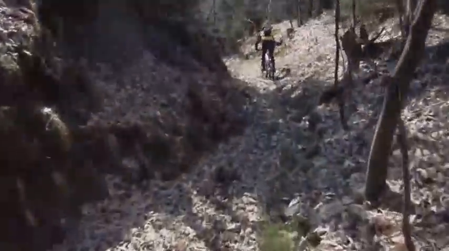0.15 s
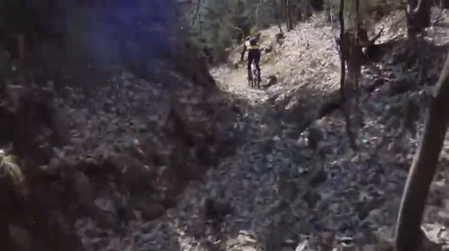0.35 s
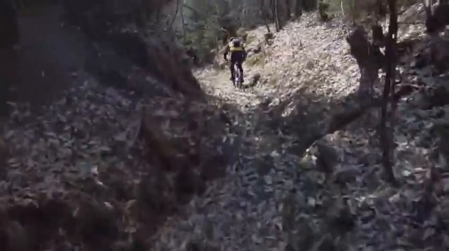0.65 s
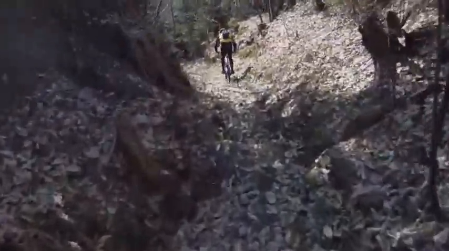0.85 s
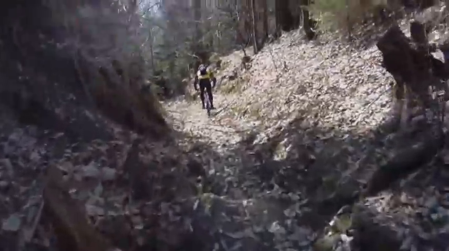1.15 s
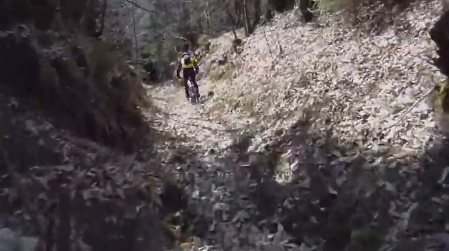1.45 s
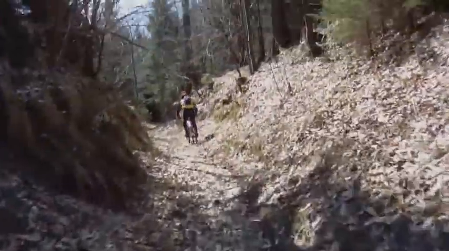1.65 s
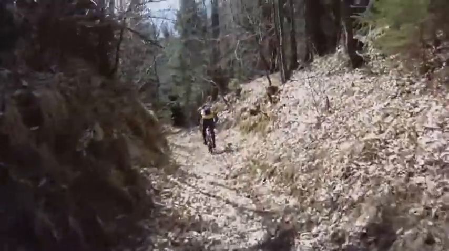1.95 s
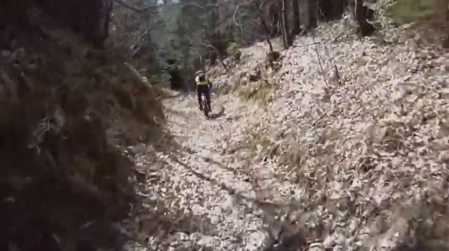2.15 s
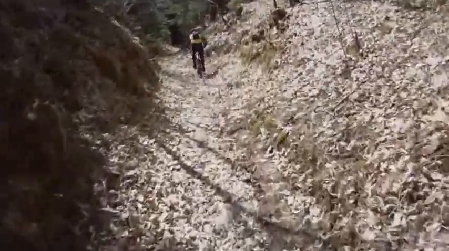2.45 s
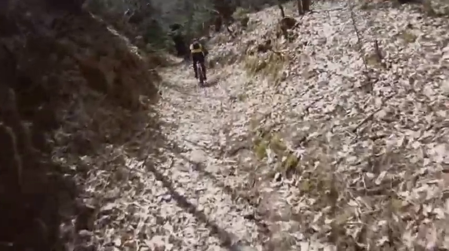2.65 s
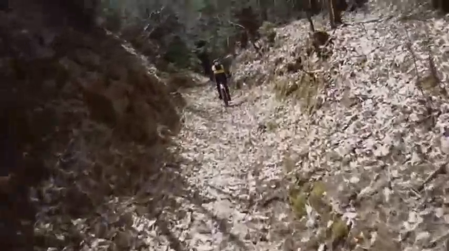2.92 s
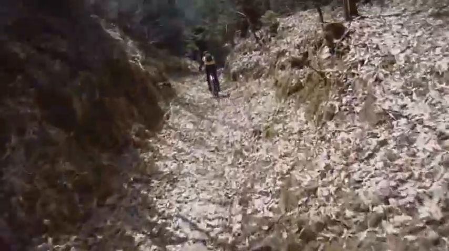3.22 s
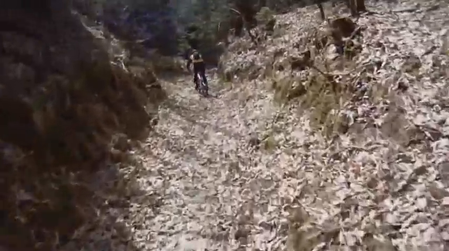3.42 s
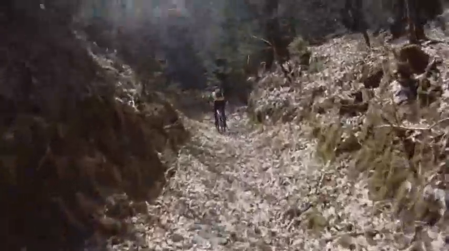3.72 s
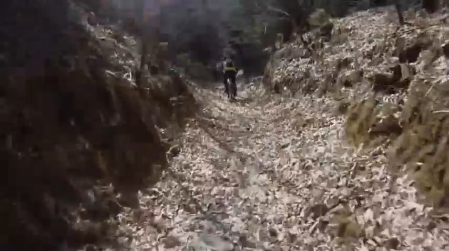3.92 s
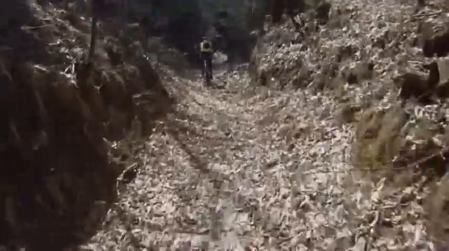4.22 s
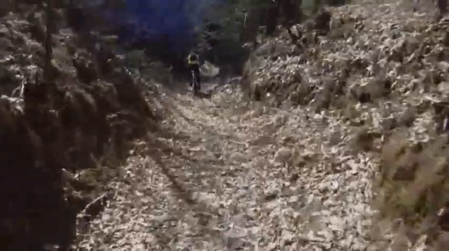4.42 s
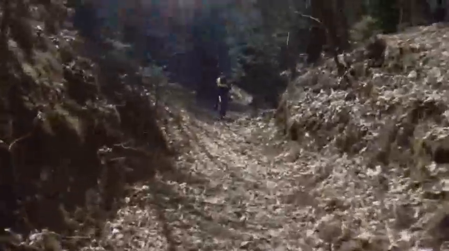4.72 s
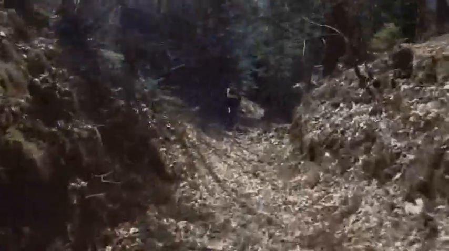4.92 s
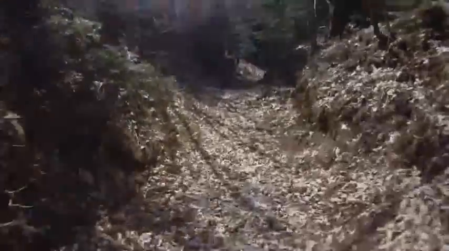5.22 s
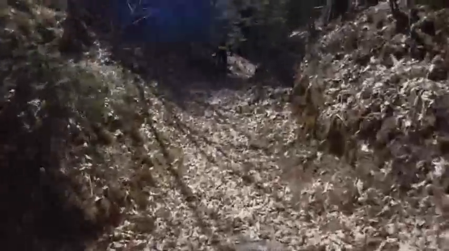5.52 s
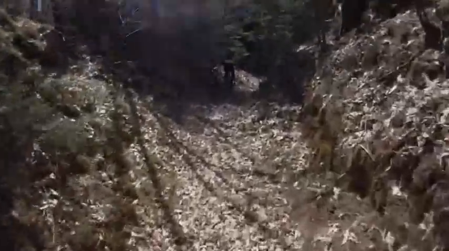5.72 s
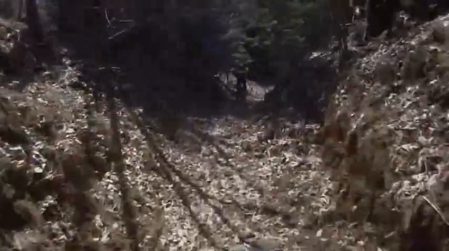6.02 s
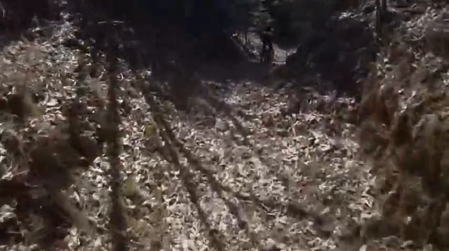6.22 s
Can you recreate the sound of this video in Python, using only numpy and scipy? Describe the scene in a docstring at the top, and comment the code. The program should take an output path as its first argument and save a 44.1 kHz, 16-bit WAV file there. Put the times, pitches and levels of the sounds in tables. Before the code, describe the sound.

Mountain bike tyres crackle through dry leaves and twigs, with frame knocks and a hollow wind rush that grows with speed.

```python
"""Dry leaves crackle and swish as a mountain bike coasts over them, down a forest trail.
The tyres burst heaps of leaves, snap twigs and flick stones. A faint hum comes and goes, the brake
pads make the discs squeak softly, and bumps knock through the frame. It is all heard from a camera
in a closed case on the rider: as the bike gathers speed, air and shaking from the trail beat on
the case and grow into a hollow rush."""
import sys
import numpy as np
from scipy import signal
from scipy.fft import rfft, irfft, next_fast_len
from scipy.io import wavfile

SR = 44100
rng = np.random.default_rng(int(sys.argv[2]) if len(sys.argv) > 2 else 0)


def wav_out(sig):
    """Save sig, one row per channel (or a flat mono array), as 16-bit PCM at SR to the path in sys.argv[1]."""
    wavfile.write(sys.argv[1], SR, np.round(np.clip(np.atleast_2d(sig).T, -1, 1) * 32767).astype(np.int16))


N = 280917

# Levels in the tables are relative: the functions may turn a whole layer up or down.
# how deep the leaves lie, given as how loudly they crackle: t/s, level/dB
LEAF_DEPTH = [(0.0, -60.5), (0.18, -68), (0.27, -58.5), (0.48, -66), (0.57, -59.5), (0.74, -60.5),
              (0.95, -57.5), (1.13, -56), (1.24, -62), (1.6, -62.5), (2.04, -64.5), (2.15, -60.5),
              (3.54, -62), (3.65, -63), (3.74, -57), (3.83, -55.5), (4.12, -58.5), (4.5, -57.5),
              (4.78, -53), (4.96, -59), (5.16, -59.5), (5.23, -57.5), (5.45, -53.5), (5.71, -60),
              (5.8, -58), (5.97, -59.5), (6.03, -62), (6.22, -60.5), (6.36, -56.5)]
# tone of leaf stems breaking: f/Hz, level/dB
STEM_TONE = [(200, -15), (650, 4.5), (1000, -5.5), (1400, -7), (2200, -0.5), (3500, 1.5), (4300, -3),
             (5500, -7.5), (9000, -15), (16000, -42.5)]
# tone of leaf blades crumbling: f/Hz, level/dB
BLADE_TONE = [(500, -7.5), (2500, 1), (5000, -3.5), (7500, 0), (9500, -2), (12000, -1.5), (15000, -8),
              (16000, -9)]
# pitches the camera case boosts or blocks: f/Hz, width/Hz, gain/dB
CASE_BANDS = [(2410, 650, 3.5), (2760, 182, -9), (3410, 3100, -3.5), (4125, 604, 10.5), (4475, 1070, -5),
              (6620, 1000, 4)]
# hollow rush on the case, growing with speed and rough ground: t/s, level/dB
RUSH_CURVE = [(0.0, -66.5), (0.52, -67.5), (0.58, -61.5), (0.66, -66), (0.86, -66), (0.92, -63.5),
              (1.35, -64.5), (1.785, -63), (1.81, -58.5), (1.96, -57.5), (2.0, -61), (2.075, -61),
              (2.095, -51.5), (2.17, -51.5), (2.28, -47), (2.43, -49.5), (2.53, -47.5), (2.57, -49.5),
              (2.7, -55.5), (2.8, -46), (3.03, -44), (3.29, -47.5), (3.41, -45.5), (3.56, -43.5),
              (3.66, -46.5), (3.84, -47.5), (3.99, -41.5), (4.11, -45.5), (4.19, -42.5), (4.38, -45),
              (4.415, -39.5), (4.63, -46), (4.93, -42), (5.0, -42.5), (5.12, -39), (5.17, -41.5),
              (5.26, -39.5), (5.37, -45.5), (5.48, -43.5), (5.61, -47.5), (5.78, -45.5), (6.36, -45)]
# tone of that rush: f/Hz, level/dB
RUSH_TONE = [(60, -19), (200, -3.5), (330, 0), (480, 1.36), (600, -0.5), (720, -6), (900, -13),
             (1200, -20.5), (1800, -29.5), (4000, -54), (16000, -58)]
# low wind beating on the case: t/s, level/dB
WIND_CURVE = [(0.0, -77), (0.78, -66), (1.09, -74), (1.35, -60), (1.785, -66), (1.81, -58), (2.07, -56.5),
              (2.1, -52), (2.35, -52), (2.59, -56), (3.02, -49.5), (5.31, -48.5), (5.5, -52), (6.36, -50)]
# tone of that wind: f/Hz, level/dB
WIND_TONE = [(15, -23.5), (35, -14.5), (80, -2.5), (150, -3), (240, -4), (400, -16), (900, -48.5),
             (16000, -79)]
# tone of the tread grinding soil: f/Hz, level/dB
GRIT_TONE = [(200, -27.5), (600, 4.5), (1200, -3.5), (1800, 5), (2400, 1), (3500, -16), (6000, -40),
             (16000, -43)]
# tone of the microphones' hiss: f/Hz, level/dB
HISS_TONE = [(100, -26), (600, -15), (2000, -28), (4000, -14), (6500, -4.5), (9000, 10), (14000, 5.5),
             (16000, -5.5)]
# big heaps of leaves bursting: t/s, level/dB, swish against that level/dB, length/s, stem f/Hz
BIG_HEAPS = [(0.09, -52.5, -18, 0.026, 3400), (0.178, -46.5, -18, 0.026, 2350),
             (0.312, -50, -26, 0.014, 2400), (0.375, -52.5, -26, 0.015, 3380),
             (0.559, -56, -26, 0.025, 3600), (0.89, -45, -19, 0.014, 3720), (0.996, -46, -16, 0.029, 2450),
             (1.13, -52, -21, 0.011, 2400), (1.169, -48.5, -19, 0.0089, 4000),
             (1.205, -47.5, -11, 0.013, 4200), (1.379, -50, -16, 0.0099, 3900),
             (2.089, -50.5, -15, 0.019, 3500), (2.176, -45.5, -13, 0.018, 3730),
             (2.262, -50, -13, 0.006, 3450), (2.291, -47, -22, 0.0064, 3640), (2.371, -61, -1, 0.009, 3500),
             (2.587, -52.5, -3.5, 0.036, 3460), (2.627, -52.5, -8, 0.04, 2400),
             (2.677, -63, -4, 0.023, 3500), (2.708, -59, 3, 0.024, 3900), (2.946, -52, -21, 0.029, 3300),
             (3.039, -50.5, -22, 0.034, 2450), (3.155, -43.5, -21, 0.0094, 3300),
             (3.243, -52, -24, 0.029, 4150), (3.306, -46, -17, 0.017, 3420),
             (3.374, -47.5, -27, 0.0095, 3400), (3.506, -54, -22, 0.016, 4000),
             (3.916, -45.5, -14, 0.029, 2280), (4.216, -42.5, -17, 0.0082, 4150),
             (4.279, -44, -15, 0.013, 4300), (4.406, -47.5, -14, 0.047, 1700),
             (4.567, -43, -16, 0.021, 2400), (4.642, -43.5, -15, 0.013, 3400),
             (4.839, -42, -26, 0.025, 2220), (4.873, -46, -10, 0.045, 3800), (4.998, -46, -17, 0.02, 3960),
             (5.198, -43.5, -16, 0.028, 3400), (5.256, -46, -31, 0.047, 2350),
             (5.556, -45, -8.5, 0.02, 3900), (5.63, -45, -11.5, 0.029, 2300),
             (5.672, -46, -19, 0.034, 4100), (5.708, -45, -14, 0.011, 3500),
             (5.878, -44.5, -21, 0.01, 3450), (5.965, -47.5, -23, 0.022, 3500),
             (6.054, -43.5, -15, 0.0088, 3980), (6.144, -44.5, -14.5, 0.014, 1700),
             (6.244, -41.5, -10.5, .016, 1900)]
# tone of a bursting heap: f/Hz, level/dB
HEAP_TONE = [(300, -15), (700, 0), (1300, -2), (2300, -1.5), (3000, 5.5), (3400, 4.5), (4200, 1),
             (5200, -4), (9000, -12), (16000, -72)]
# twigs snapping under the tyres: t/s, level/dB, f/Hz, width/Hz, tearing time/s
TWIG_SNAPS = [(0.1742, -52, 5500, 3300, .0022), (0.3825, -51, 4200, 2900, .0022),
              (0.9325, -49, 3300, 2200, .0022), (1.2035, -49, 5500, 3300, .0022),
              (1.433, -48, 3200, 1900, .0022), (2.2635, -47, 3450, 700, .003),
              (2.4225, -44.5, 3300, 1200, .0022), (2.489, -53, 6500, 4000, .0022),
              (3.417, -53, 6500, 4000, .0022), (3.867, -49, 8500, 5200, .0022),
              (3.917, -43, 8000, 4900, .0022), (4.349, -49, 5500, 3300, .0022),
              (4.356, -43, 3200, 1500, .0022), (4.6094, -46, 5000, 3000, .0022),
              (4.851, -42, 2200, 500, .006), (5.203, -43, 3500, 800, .006), (5.632, -44, 2300, 700, .004),
              (5.772, -48, 3800, 2300, .0022), (6.119, -50, 8500, 5200, .0016)]
# stones clacking under the tyres: t/s, level/dB, f/Hz
STONE_HITS = [(0.192, -52, 1610), (0.984, -46, 1080), (1.119, -53, 900), (2.4205, -48, 1550),
              (2.755, -48.5, 2140), (3.705, -45.5, 1620), (4.525, -42, 960), (4.586, -43.5, 1520),
              (5.3256, -43, 940), (5.3729, -40, 1190), (5.379, -44.5, 1550), (5.385, -43, 1220)]
# the ways a stone rings: multiple of its pitch, level/dB, time to fade by 60 dB/s
STONE_RINGS = [(.78, 9, 0.027), (1, 16, 0.017), (1.27, 10, 0.02), (1.7, 8, .01)]
# brake pads touching the discs: t/s, length/s, f/Hz, level/dB
PAD_TOUCHES = [(0.615, 0.016, 15130, -58), (0.729, 0.01, 15090, -62), (0.842, .008, 15050, -67),
               (0.954, .008, 15050, -67), (0.985, 0.016, 15200, -65), (1.213, 0.016, 15090, -67),
               (2.14, 0.035, 9990, -63.5), (2.192, 0.013, 9990, -59), (3.148, 0.028, 11880, -65),
               (3.287, 0.088, 11900, -61.5), (3.445, 0.078, 11890, -62), (3.844, 0.06, 11870, -66.5),
               (3.954, 0.04, 11840, -63), (4.17, 0.014, 15020, -64.5), (4.338, 0.026, 14900, -61.5),
               (4.568, 0.03, 11880, -58.5), (4.625, 0.025, 11880, -62.5), (4.774, 0.085, 11900, -56.5),
               (4.815, 0.012, 10100, -62), (4.922, 0.018, 14950, -59.5), (4.964, 0.03, 11820, -62),
               (5.025, 0.06, 11890, -62), (5.235, 0.055, 11780, -60.5), (5.342, 0.025, 11850, -65),
               (5.457, 0.03, 14930, -66), (5.938, 0.028, 11850, -57.5), (6.038, 0.016, 9990, -60)]
# bumps knocking through the frame: t/s, level/dB, metal clack against that level/dB
BUMPS = [(0.8195, -33, -3.5), (0.931, -42, -7), (1.602, -45, -16), (2.126, -40.5, -30), (2.281, -33, -30),
         (2.323, -33, -30), (2.478, -36, -30), (2.895, -28, -24), (2.979, -33, -30), (3.114, -32.5, -30),
         (3.341, -30.5, -30), (3.471, -32, -28), (3.882, -33, -30), (4.150, -29.5, -30),
         (4.243, -29.5, -30), (4.396, -30, -30), (4.421, -29.5, -30), (4.889, -34, -30), (4.976, -31, -30),
         (5.010, -30, -30), (5.094, -30, -30), (5.146, -30, -30), (5.227, -30.5, -30), (5.473, -30, -30),
         (5.526, -32.5, -20), (5.722, -32, -30), (5.758, -31.5, -30), (5.897, -31, -30)]
# the ways the frame rings: f/Hz, level/dB, time to fade by 60 dB/s
FRAME_RINGS = [(170, -13, .03), (330, -6, .025), (490, -5, .045), (650, -10, .04)]
# the ways metal parts ring when they meet: f/Hz, level/dB, time to fade by 60 dB/s
METAL_RINGS = [(1500, -18, .012), (2137, -17, .025), (2514, -8, .026), (2990, -6, .018), (3450, -6, .012)]


def from_db(db):
    """Turn decibels into a number to multiply a sound by."""
    return 10 ** (np.asarray(db) / 20)


def rms_one(x):
    """Scale a signal so that its average power is 1."""
    return x / np.sqrt(np.mean(x ** 2) + 1e-20)


def in_time(curve):
    """Join a curve's points with straight lines, giving a level for every sample."""
    times, levels = np.transpose(curve)
    return np.interp(np.arange(N) / SR, times, levels)


def coloured(x, tone):
    """Give a sound the tone in a table, and an average power of 1."""
    size = 2 * next_fast_len(N // 2 + SR // 4)
    hz, db = np.transpose(tone)
    grid_hz = np.maximum(np.arange(size // 2 + 1) * SR / size, 1)
    gain = from_db(np.interp(np.log(grid_hz), np.log(hz), db))
    # make the filter ring only after each click, never before it (minimum phase)
    cepstrum = irfft(np.log(gain))
    cepstrum[1:size // 2] *= 2
    cepstrum[size // 2 + 1:] = 0
    return rms_one(irfft(rfft(x, size) * np.exp(rfft(cepstrum)))[:N])


def drift(rate_hz):
    """A smooth random wobble about 1 in size; a higher rate wobbles faster."""
    step = 40  # samples between random values
    r = np.exp(-2 * np.pi * step * rate_hz / SR)
    noise = rng.standard_normal(N // step + 2002)
    slow = signal.lfilter([1], [1, -2 * r, r * r], noise)[2000:]  # skip while the filter settles
    return np.interp(np.arange(N) / step, np.arange(len(slow)), rms_one(slow))


def grains(per_s, spread_db):
    """Tiny clicks at random moments, many weak and a few strong."""
    sizes = from_db(spread_db * np.minimum(rng.exponential(1, N), 4))
    return rms_one(sizes * rng.choice([-1, 1], N) * (rng.random(N) < per_s / SR))


def dulled(x, top_hz):
    """Soften a sound by fading out the pitches above top_hz."""
    return signal.sosfilt(signal.butter(4, top_hz, fs=SR, output="sos"), x)


def resonate(x, hz, width_hz, db):
    """Boost or cut a band around one pitch."""
    a, g, c = np.pi * width_hz / SR, from_db(db / 2), -2 * np.cos(2 * np.pi * hz / SR)
    return signal.lfilter([1 + a * g, c, 1 - a * g], [1 + a / g, c, 1 - a / g], x)


def strike(times, levels_db, rings):
    """Blows make an object ring at several pitches, in a slightly different mix each time."""
    out, at = np.zeros(N), np.round(np.asarray(times) * SR).astype(int)
    for k, (hz, db, fade_s) in enumerate(rings):
        clicks = np.zeros(N)
        direction = (-1) ** k  # neighbouring pitches start by swinging opposite ways
        clicks[at] = direction * from_db(levels_db + db + rng.standard_normal(len(at)))
        decay, turn = from_db(-60 / (fade_s * SR)), 2 * np.pi * hz / SR
        out += signal.lfilter([.5, 0, -.5], [1, -2 * decay * np.cos(turn), decay ** 2], clicks + 1e-18)
    return out


def crunch_swell(times, levels_db, lengths, rise_s):
    """How loud heaps are over time: each gives way quickly, then dies off over its length."""
    t, power = np.arange(N) / SR, np.zeros(N)
    for s, db, length in zip(times, levels_db, lengths):
        near = slice(max(int((s - rise_s) * SR), 0), int((s + 4 * length) * SR))
        age = t[near] - s
        shape = np.clip(1 + age / rise_s, 0, 1) * np.exp(-(np.maximum(age, 0) / length) ** 2)
        power[near] += (from_db(db) * shape) ** 2
    return np.sqrt(power)


def leaves(depth_db):
    """Stems break in clumps of rough snaps; the blades crumble in a finer, smoother swish."""
    clumps = .8 * drift(35) + .6 * drift(120)
    snaps = grains(per_s=2600, spread_db=2.5) + 0.88 * rng.standard_normal(N)
    crackle = coloured(snaps, STEM_TONE) * from_db(depth_db - 1.5 + 1.63 * clumps)
    usual_depth_db, usual_swish_db = -60, -64.5
    ground_swish = from_db(usual_swish_db + 0.7 * (depth_db - usual_depth_db) + 1.17 * clumps)
    times, heap_db, swish_db, lengths, _ = np.transpose(BIG_HEAPS)
    heap_swish = crunch_swell(times, heap_db + swish_db, lengths, rise_s=0.017)
    crumbs = grains(per_s=7000, spread_db=0.5) + 0.39 * rng.standard_normal(N) + .5 * snaps
    return crackle + coloured(crumbs, BLADE_TONE) * np.hypot(ground_swish, heap_swish)


def camera_case(x):
    """The plastic case rings at some pitches and blocks others."""
    for hz, width_hz, db in CASE_BANDS:
        x = resonate(x, hz, width_hz, db)
    return x


def rush(rush_db, wind_db):
    """Swirling air and jolts tap on the case: a lumpy, hollow roar over low wind and a faint rumble."""
    taps = grains(per_s=2600, spread_db=2.5) + .5 * rng.standard_normal(N)
    roar = coloured(taps * from_db(0.63 * drift(33)), RUSH_TONE)
    wind = coloured(rng.standard_normal(N) * from_db(drift(1.7)), WIND_TONE)
    rumble = rms_one(dulled(rng.standard_normal(N), top_hz=69))
    return roar * from_db(rush_db) + wind * from_db(wind_db - 1) + rumble * from_db(-77.5)


def grit(rush_db):
    """The tread grinds the soil harder as the speed, and with it the rush, rises."""
    grinding = grains(per_s=1300, spread_db=5) * from_db(2.7 * drift(35))
    return coloured(grinding, GRIT_TONE) * from_db(rush_db - 21)


def hiss():
    """Each of the two microphones adds a faint, steady hiss of its own."""
    return np.array([coloured(rng.standard_normal(N), HISS_TONE) for _ in range(2)]) * from_db(-82)


def small_heaps(depth_db, per_s, spread_db, length_s):
    """How loud small heaps are over time: they burst at random, louder where the leaves lie deep."""
    at = np.flatnonzero(rng.random(N) < per_s / SR)
    levels_db = depth_db + 5 + spread_db * rng.standard_normal(N)
    return crunch_swell(at / SR, levels_db[at], np.full(len(at), length_s), rise_s=0.0011)


def heaps(depth_db):
    """Heaps of leaves burst in sharp snaps; each big one crackles around the pitch of its own stems."""
    snaps = grains(per_s=2500, spread_db=1.5) + .5 * rng.standard_normal(N)
    crackle = coloured(snaps, HEAP_TONE)
    out = crackle * small_heaps(depth_db, per_s=6.5, spread_db=4, length_s=0.021)
    for s, heap_db, _, length, stem_hz in BIG_HEAPS:
        burst = crackle * crunch_swell([s], [heap_db], [length], rise_s=0.0064)
        out += resonate(burst + 1e-18, stem_hz, width_hz=650, db=7)
    return out * from_db(-9)


def twigs():
    """Dry fibres tear in an instant; thin twigs snap high and bright, thick ones with a woody ring."""
    out = np.zeros(N)
    for s, db, hz, width_hz, tear_s in TWIG_SNAPS:
        age = np.arange(int(10 * tear_s * SR)) / SR
        band = signal.butter(2, [hz - width_hz / 2, hz + width_hz / 2], "band", fs=SR, output="sos")
        fibres = rms_one(signal.sosfilt(band, rng.standard_normal(len(age))))
        at = int(s * SR)
        out[at:at + len(age)] += from_db(db) * np.exp(-age / tear_s) * fibres
    return out


def stones():
    """Loose stones click against each other, the small ones higher."""
    out = np.zeros(N)
    for s, db, hz in STONE_HITS:
        rings = [(hz * multiple, ring_db, fade_s) for multiple, ring_db, fade_s in STONE_RINGS]
        out += strike([s + 0.00183], db - 13.5, rings)
    return dulled(out, top_hz=2600)


def hum(start_s, length_s, hz, db):
    """A faint, low hum swells and fades."""
    t = np.arange(N) / SR
    progress = np.clip((t - start_s) / length_s, 0, 1)
    swell = np.sqrt(np.abs(np.sin(np.pi * progress)))
    return from_db(db) * swell * np.sin(2 * np.pi * hz * t)


def brakes(rise_s, fade_s, waver_hz, rasp_hz, slip_hz):
    """A dragging pad makes its disc sing one high, raspy note."""
    t, out = np.arange(N) / SR, np.zeros(N)
    wobble_hz = waver_hz * drift(90) + rasp_hz * drift(700)
    flutter = from_db(4.9 * drift(140))
    for s, length, hz, db in PAD_TOUCHES:
        near = slice(int((s - rise_s) * SR), int((s + length + .15) * SR))
        age = t[near] - s
        shape = np.clip(1 + age / rise_s, 0, 1) * np.exp(-np.maximum(age - length, 0) / fade_s)
        phase = 2 * np.pi * np.cumsum(hz + wobble_hz[near]) / SR
        # the pad sticks and slips, adding a weaker note below and another above
        slip = 2 * np.pi * slip_hz * age
        side_notes = from_db(-9.5) * np.sin(phase - slip) + from_db(-15) * np.sin(phase + slip)
        out[near] += from_db(db) * shape * flutter[near] * (np.sin(phase) + side_notes)
    return out


def knocks(bounce_s, bounce_db):
    """A bump thuds through the frame, which bounces back; a hard stop adds a metal clack."""
    times, db, clack_db = np.transpose(BUMPS)
    thud = strike(times - .001, db, FRAME_RINGS)
    bounce = strike(times + bounce_s, db + bounce_db, FRAME_RINGS)
    clack = strike(times, db + clack_db, METAL_RINGS)
    return dulled(thud + bounce, top_hz=950) + dulled(clack, top_hz=4200)


def scene():
    """Both microphones hear the same ride; only their hiss differs."""
    depth_db = in_time(LEAF_DEPTH)
    jolts_db = 1.35 * drift(33)  # small jolts shake the case and press the tread into the soil at once
    rush_db = in_time(RUSH_CURVE) + jolts_db
    tyres = camera_case(leaves(depth_db) + heaps(depth_db) + grit(rush_db) + twigs())
    blows = knocks(bounce_s=.0065, bounce_db=-10) + stones()
    squeaks = brakes(rise_s=0.009, fade_s=.017, waver_hz=30, rasp_hz=165, slip_hz=3830)
    air = rush(rush_db, in_time(WIND_CURVE))
    return tyres + air + blows + squeaks + hum(start_s=0.33, length_s=0.31, hz=262, db=-67) + hiss()


def record(dry):
    """The very highest treble is cut off steeply."""
    cutoff_hz = 15650
    return signal.sosfilt(signal.ellip(12, .1, 80, cutoff_hz, fs=SR, output="sos"), dry)


dry = scene()
out = record(dry)
wav_out(out)
```